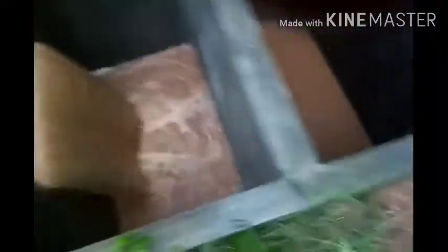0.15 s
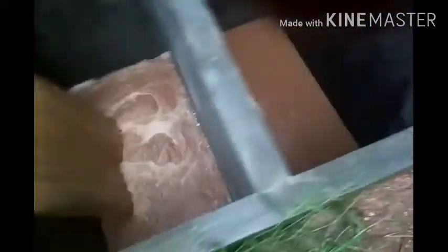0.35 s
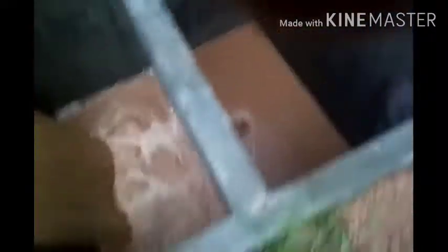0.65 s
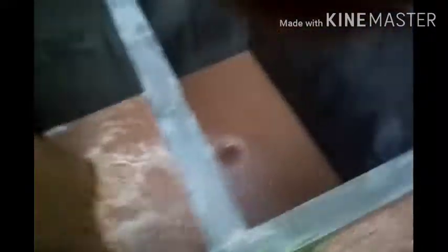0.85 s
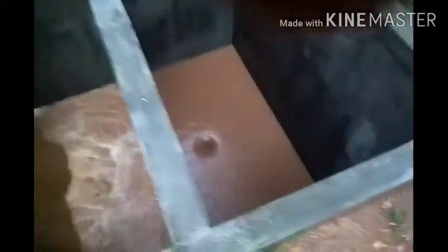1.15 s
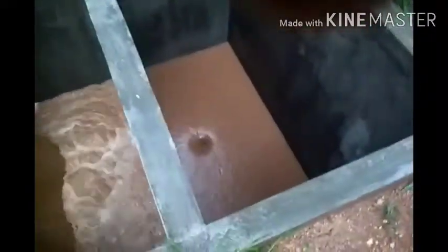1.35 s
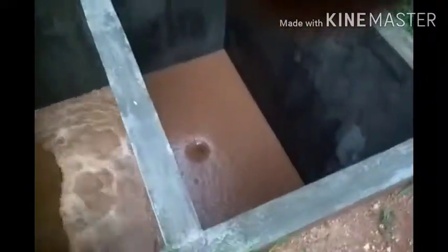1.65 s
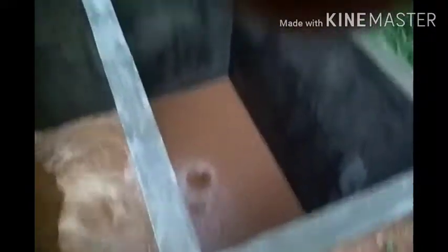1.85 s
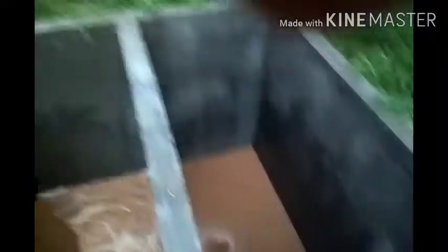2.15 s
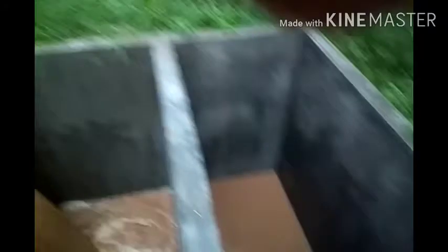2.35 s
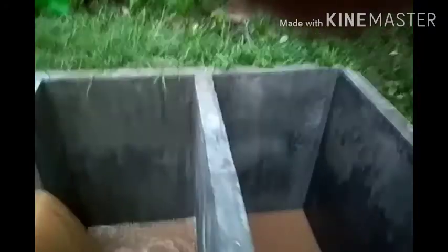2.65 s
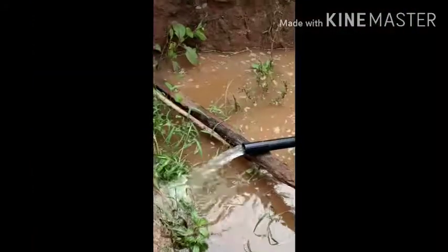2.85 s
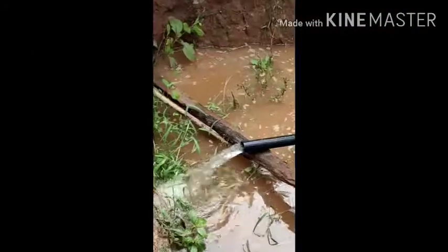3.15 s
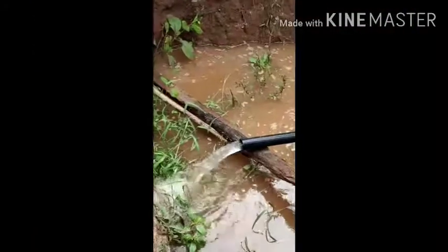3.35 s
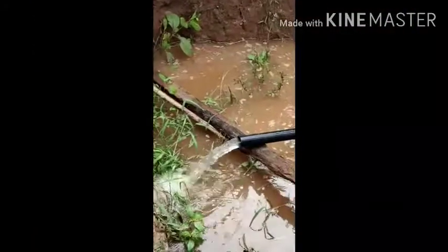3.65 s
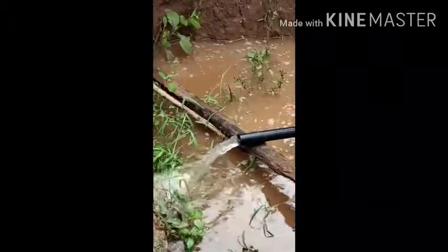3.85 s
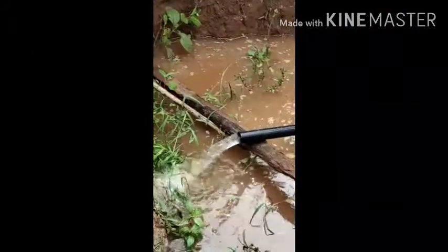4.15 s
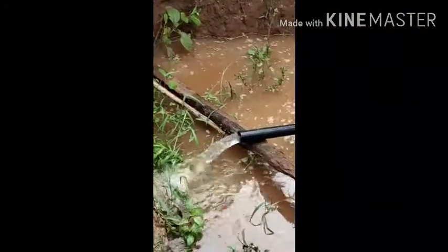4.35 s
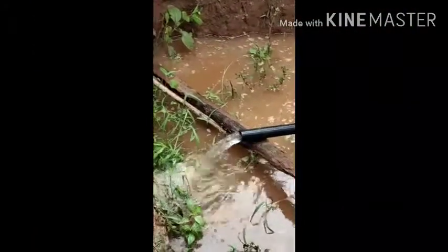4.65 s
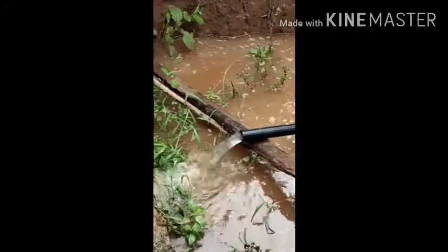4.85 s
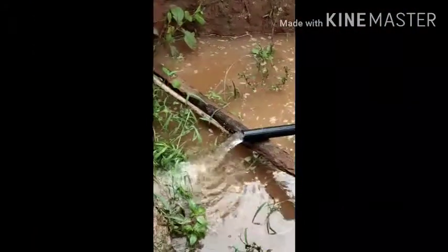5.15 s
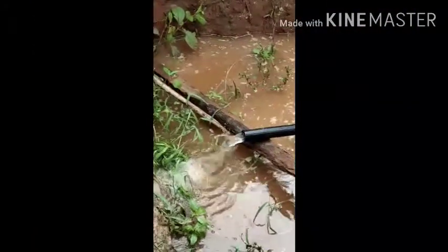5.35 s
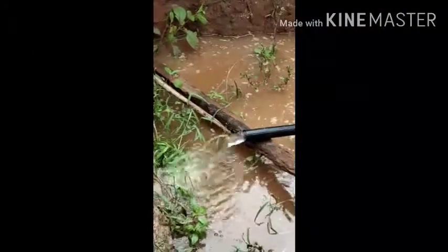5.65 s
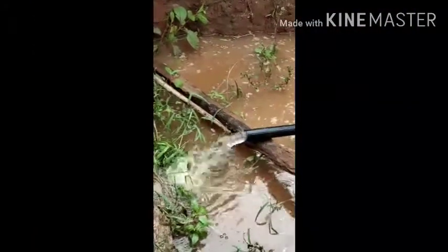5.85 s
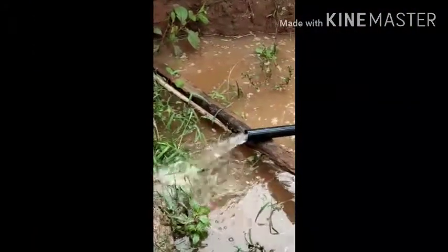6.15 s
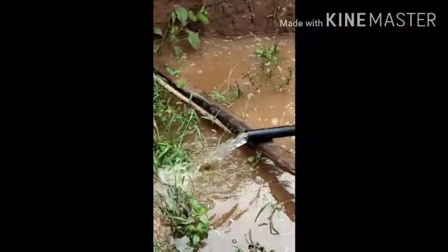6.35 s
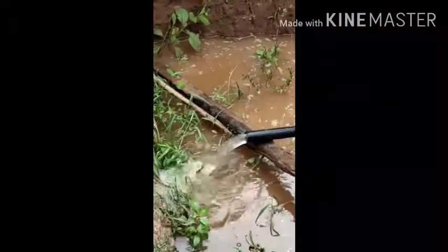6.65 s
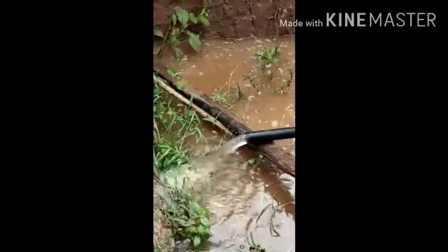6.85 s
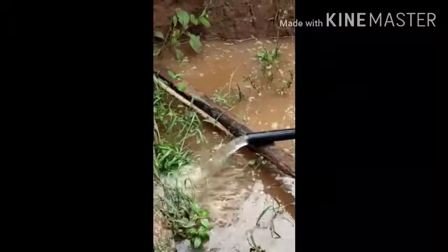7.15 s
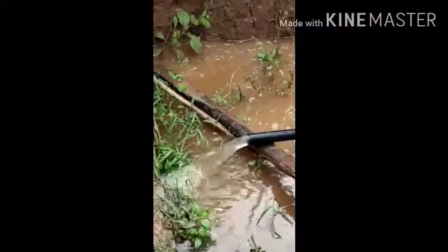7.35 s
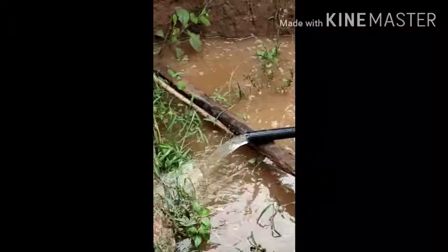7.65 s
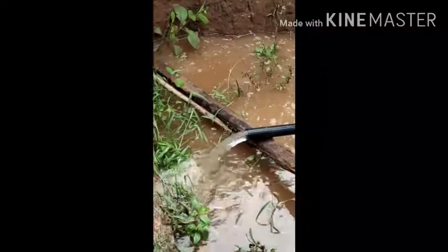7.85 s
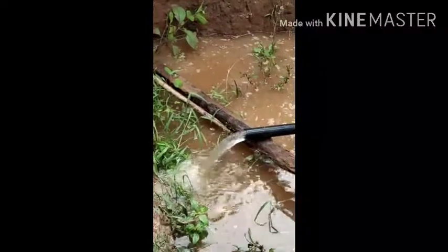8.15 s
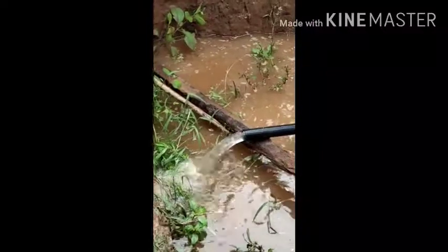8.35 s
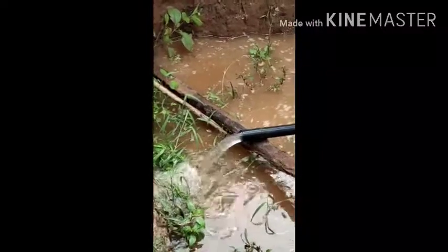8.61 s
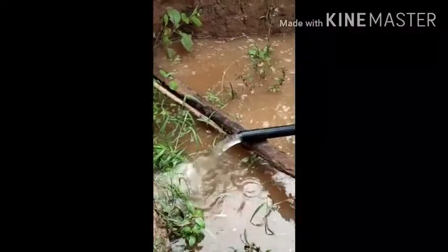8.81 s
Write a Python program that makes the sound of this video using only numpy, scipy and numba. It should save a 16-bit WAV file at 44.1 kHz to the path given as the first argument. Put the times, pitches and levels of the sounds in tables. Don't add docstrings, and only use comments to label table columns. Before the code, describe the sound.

Muddy water gushes into a concrete pit, a thick, full roar with uneven heaves, fizzing spray and dull low knocks, strongest just after one second. Near three seconds it quickly fades into a quieter outdoor pour: a pipe jet splashing in a ditch, with wet slaps, hollow glugs and crisp drops. The flow surges most around the middle, then calms. Close stereo pickup, slightly lossy.

```python
import sys
import numpy as np
from scipy import signal
from scipy.fft import rfft, irfft, next_fast_len
from scipy.io import wavfile
from scipy.ndimage import uniform_filter1d, minimum_filter1d, map_coordinates
from numba import njit

SR = 44100
rng = np.random.default_rng(int(sys.argv[2]) if len(sys.argv) > 2 else 0)


def to_linear_factor(level_db):
    exponent = np.asarray(level_db, float) / 20
    return 10 ** exponent


def file_out(sig):
    cols = np.atleast_2d(sig).T
    lim = np.clip(cols, -1, 1)
    pcm = np.round(lim * 32767).astype(np.int16)
    wavfile.write(sys.argv[1], SR, pcm)


N = 396009
PIT_N, DITCH_N = 3 * SR, N - int(2.8 * SR)
FADE_START_S, FADE_END_S = 2.862, 2.946


def unit(x):
    return x / np.sqrt(np.mean(np.mean(np.atleast_2d(x), 0) ** 2) + 1e-20)


def curve(rows):
    s, db = np.transpose(rows)
    return np.interp(np.arange(N) / SR, s, db)


def wobble(rate):
    knots = rng.standard_normal(int(N * rate / SR) + 4)
    return map_coordinates(knots, [np.arange(N) * rate / SR], order=1)


def swells(rows, rise, fall):
    t = np.arange(N) / SR
    total = np.zeros(N)
    for s, long, db in rows:
        hold_end = s + max(long - fall, rise + .001)
        total += db * np.interp(t, [s - rise, s + rise, hold_end, s + long + fall], [0, 1, 1, 0])
    return total


def jolts(s, db, fade):
    kicks = np.bincount(np.clip(s * SR, 0, N - 1).astype(int), to_linear_factor(db), N)
    return signal.lfilter([1], [1, -np.exp(-1 / (fade * SR))], kicks)


@njit
def ring(n, sr, start, hz, cycles, size, aside, rise):
    out = np.zeros((2, n))
    for i in range(len(start)):
        life = cycles[i] / hz[i] * sr
        step = 2 * np.pi * hz[i] / sr
        for k in range(min(int(4 * life), n - start[i])):
            u = k / life
            envelope = size[i] * np.exp(-1.5 * u) * min(1.0, 8 * u)
            v = envelope * np.sin(step * k * (1 + rise * u / 2))
            out[0, start[i] + k] += v
            out[1, start[i] + k] += v * aside[i]
    return out


def bubbles(n, s, hz, cycles, size, aside, rise):
    start = np.clip(s * SR, 0, n - 1).astype(np.int64)
    return ring(n, SR, start, np.clip(hz, 20, SR / 3), cycles, size, aside, rise)


def cluster(events, count, spacing, scatter, cycles, fall_db, gain_db, rise):
    s, db, hz = np.transpose(events)[:3, :, None]
    g = rng.standard_normal((len(events), count, 3))
    nth = np.arange(count)
    when = s + spacing * nth * np.exp(.3 * g[..., 0])
    pitch = hz * np.exp(scatter * g[..., 1] * (nth > 0))
    size = to_linear_factor(db + gain_db - fall_db * nth)
    aside = .5 * g[..., 2]
    lives = np.full(size.size, cycles)
    return bubbles(N, when.ravel(), pitch.ravel(), lives, size.ravel(), aside.ravel(), rise)


def froth(n, low_hz, high_hz, count, cycles, spread_db, grain_db, patchy_db):
    u, g = rng.random((count, 3)), rng.standard_normal((count, 2))
    hz = low_hz * (high_hz / low_hz) ** u[:, 1]
    size = hz * to_linear_factor(-spread_db * np.log(u[:, 2] + 0.0042))
    swarm = bubbles(n, n / SR * u[:, 0], hz, cycles * np.exp(0.24 * g[:, 0]), size, g[:, 1], 0.056)
    z = signal.stft(rng.standard_normal((2, n)), nperseg=512)[2]
    field = uniform_filter1d(rng.standard_normal(z.shape[1:]), size=4, axis=0)
    field = uniform_filter1d(field, size=4, axis=1)
    patches = to_linear_factor(patchy_db * field / field.std())
    rush = signal.istft(z * patches, nperseg=512)[1][:, :n]
    return rush / rush.std() + to_linear_factor(grain_db) * swarm / swarm[0].std()


def ports(pair, table, lag_s, lag_hz, low_hz=0, high_hz=SR, tilt_only=False):
    n = pair.shape[1]
    m = next_fast_len(n + 8192)
    hz = np.fft.rfftfreq(m, 1 / SR) + 1
    f, *cols = np.transpose(table)
    left_db, right_db, alike = [np.interp(np.log(hz), np.log(f), c) for c in cols]
    turn = np.arccos(np.clip(alike, 0, 1)) / 2
    shared, apart = rfft(pair, m) * [np.cos(turn), np.sin(turn)]
    mean_db = (left_db + right_db) / 2 * tilt_only
    band = 1 / np.sqrt((1 + (low_hz / hz) ** 12) * (1 + (hz / high_hz) ** 12))
    late = np.exp(-1j * np.pi * hz * lag_s / (1 + (lag_hz / hz) ** 2))
    left = (shared + apart) * to_linear_factor(left_db - mean_db) * late
    right = (shared - apart) * to_linear_factor(right_db - mean_db) / late
    return irfft(np.array([left, right]) * band, m)[:, :n]


# (frequency [Hz], left [dB per Hz], right [dB per Hz], likeness of ports [0-1])
PIT_PORTS = [(35, 4, 7, 1), (86, -10.5, -13.5, 0.74), (187, -5.5, -11.5, 0.99), (250, 0.5, -2, 0.96),
             (350, 3.5, 4, 0.96), (500, 1, -0.5, 0.94), (695, -5.0, -7.5, 0.98), (1400, -5.5, -12, 0.89),
             (1960, -9, -8, 0.46), (2800, -25.5, -16.5, 0), (4700, -18.5, -20.5, 0), (5840, -22, -21, 0.07),
             (8000, -23.5, -21, 0), (10350, -18, -12.5, 0), (12500, -23, -12.5, 0.25),
             (16400, -12, -24.5, 0.3)]


def at_pit(pair, low_hz, high_hz, tilt_only=False):
    return unit(ports(pair, PIT_PORTS, 0.000288, 730, low_hz, high_hz, tilt_only))


# (frequency [Hz], left [dB per Hz], right [dB per Hz], likeness of ports [0-1])
DITCH_PORTS = [(30.3, -11, -9, 0.91), (175, -9, -9, 0.97), (350, -2, -3, 0.98), (586, -7, -11.5, 0.44),
               (900, -4.5, -3.5, 0.54), (1240, -6, -7.5, 0.53), (1880, 0, -5.5, 0.96),
               (2390, -5.5, -10.5, 0.52), (2960, -13.5, -12.5, 0.52), (4460, -12, -15.5, 0.14),
               (5270, -22, -19, 0.61), (6150, -13, -20.5, 0.1), (8450, -16, -8, 0.037),
               (9800, -21.5, -18, 0.56), (11000, -17.5, -20.5, 0.26), (12500, -15.5, -26, 0.21),
               (15100, -21, -38, .2), (15600, -28, -42, 0.17)]


def at_ditch(pair, low_hz=0, high_hz=SR, tilt_only=False):
    return ports(pair, DITCH_PORTS, 0.000212, 2420, low_hz, high_hz, tilt_only)


# (time [s], strength [dB])
DRAUGHT = [(0, -57), (.34, -56), (.42, -48), (.6, -57), (.71, -50), (.77, -57), (.9, -55), (1.15, -51),
           (1.3, -48), (1.5, -51), (2, -54), (2.37, -65), (2.6, -55), (2.9, -61)]


def pit_draught():
    draught_db = curve(DRAUGHT)[:PIT_N]
    rumble = froth(PIT_N, 100, 190, count=40, cycles=3.5, spread_db=2, grain_db=-16, patchy_db=.3)
    upper = to_linear_factor(draught_db + 3) * at_pit(rumble, 75, 205, tilt_only=True)
    lower = to_linear_factor(-53.5 + 0.57 * (draught_db + 51)) * at_pit(rumble, 9.2, 73, tilt_only=True)
    return upper + lower


# (time [s], level [dB])
THROB = [(0, -61), (.45, -57), (1.07, -60), (1.12, -39), (1.28, -35), (1.39, -44), (1.45, -53), (1.66, -51),
         (1.75, -58), (2.05, -64)]


def pit_throb():
    throb_db = curve(THROB)[:PIT_N]
    foam = froth(PIT_N, 83, 85, count=60, cycles=4.2, spread_db=-2, grain_db=-29, patchy_db=8.5)
    since_peak_s = (np.arange(PIT_N) - throb_db.argmax()) / SR
    sinking = 0.066 * np.clip(since_peak_s, 0, .15) / 0.23
    hz = 92 * (1 + 0.025 * wobble(5.97)[:PIT_N] - sinking)
    tone = np.sin(2 * np.pi * np.cumsum(hz) / SR)
    return to_linear_factor(throb_db - 3.5) * at_pit(foam, 82, 99) + to_linear_factor(throb_db + 1.5) * tone


# (time [s], strength [dB])
CHURN = [(0, -38), (1, -37.5), (1.4, -39), (1.62, -39.5), (1.8, -38), (2.2, -38.5), (2.4, -40), (2.6, -39),
         (2.85, -39.5)]
# (start [s], length [s], swell [dB])
HEAVES = [(.05, 0.11, 1), (.27, 0.041, 2), (.8, 0.084, 3), (.94, 0.046, 3), (1.11, 0.036, 1),
          (1.43, 0.051, 0), (1.57, 0.078, 6), (1.855, 0.043, 5.5), (2.08, 0.087, 1.5), (2.23, 0.023, 3),
          (2.56, 0.058, 4)]


def pit_roar():
    n = PIT_N
    churn_db = curve(CHURN)
    swing_db = churn_db - churn_db[:n].mean() + swells(HEAVES, rise=0.031, fall=0.037)
    churn = wobble(15)
    plunge_db = -34.68 + .9 * swing_db + .5 * churn
    bubbling_db = -36 + .7 * swing_db + .9 * churn
    spray_db = -31.98 + 0.26 * churn + 0.15 * wobble(39.53)
    plunge = froth(n, 202.2, 803.5, count=1500, cycles=10.1, spread_db=-.5, grain_db=-5, patchy_db=0)
    bubbling = froth(n, 607, 3370, count=4000, cycles=10.1, spread_db=-1, grain_db=-5.5, patchy_db=-.6)
    spray = froth(n, 2400, 15600, count=9000, cycles=1.7, spread_db=1.5, grain_db=-10, patchy_db=1.53)
    roar = to_linear_factor(plunge_db[:n]) * at_pit(plunge, 190, 700)
    roar += to_linear_factor(bubbling_db[:n]) * at_pit(bubbling, 700, 3000)
    roar += to_linear_factor(spray_db[:n]) * at_pit(spray, 3000, 18000)
    return roar


def ditch_rumble():
    low = froth(DITCH_N, 63, 187, count=80, cycles=1.9, spread_db=3.5, grain_db=-21.5, patchy_db=1.4)
    deep = froth(DITCH_N, 30, 60, count=10, cycles=3, spread_db=4, grain_db=-32, patchy_db=8)
    return to_linear_factor(-65) * unit(at_ditch(low, 62, 210)) + to_linear_factor(-84) * unit(at_ditch(deep, 15, 50))


# (start [s], length [s], swell [dB])
DRONES = [(3.1, .15, 5), (5.35, .14, 11), (5.52, .27, 8), (6.94, .14, 8)]


def pipe_drone():
    drone_db = (-68.5 + swells(DRONES, rise=.02, fall=0.025) + 2 * wobble(7.8))[-DITCH_N:]
    low = froth(DITCH_N, 140, 200, count=200, cycles=6, spread_db=1, grain_db=-10, patchy_db=.8)
    octave = froth(DITCH_N, 290, 370, count=200, cycles=8, spread_db=1, grain_db=-10, patchy_db=.8)
    drone = to_linear_factor(drone_db + 2) * unit(at_ditch(low, 150, 190))
    return drone + to_linear_factor(drone_db - 1) * unit(at_ditch(octave, 300, 360))


# (time [s], strength [dB])
FLOW = [(2.97, -51), (3.6, -51.5), (4.7, -51.5), (5.15, -53), (5.6, -52.5), (6.4, -54), (7.0, -52.5),
        (7.5, -54), (8.5, -53), (8.98, -53.5)]
# (start [s], length [s], swell [dB])
SURGES = [(3.01, 0.078, 2), (3.3, 0.057, 0.5), (3.75, 0.081, 11), (4.17, 0.16, -2), (4.39, 0.054, 3),
          (4.97, 0.08, 3), (5.14, 0.21, -5.5), (5.33, 0.051, 6), (5.43, 0.07, 8), (5.62, 0.051, 14),
          (5.68, 0.096, 11.5), (5.74, 0.028, 19), (5.88, 0.15, 8), (6.09, 0.11, 19.5), (6.27, 0.08, 5),
          (6.3, 0.14, 16), (6.52, 0.1, 16.5), (6.72, 0.057, 22), (6.8, 0.18, 10), (6.92, 0.048, -3),
          (7.1, 0.053, -3), (7.19, 0.1, 5), (7.47, 0.026, 14), (7.61, 0.034, 5), (7.81, 0.12, 4),
          (8.0, 0.071, -4), (8.21, 0.022, 8), (8.7, 0.035, -1), (8.8, 0.018, 15), (8.93, 0.071, 15)]


def ditch_pour():
    n = DITCH_N
    flow_db = curve(FLOW)
    drift_db = flow_db - flow_db[-n:].mean()
    surge_db = swells(SURGES, rise=0.009, fall=0.013)
    calm_db = np.interp(np.arange(N) / SR, [6.95, 7.2], [0, -3])
    surge = wobble(25)
    plunge_db = -57 + .79 * drift_db + 0.034 * surge_db + .6 * surge + 2 * wobble(9) + calm_db
    bubbling_db = -49.5 + drift_db + 0.18 * surge_db + surge
    spray_db = -52 + drift_db + 0.34 * surge_db
    mist_db = 1.6 * (spray_db + 48) - 55.5

    lumps = rng.random((250, 2))
    small = jolts(lumps[:, 0] * N / SR, -14 * lumps[:, 1], fade=0.013)
    s, db = np.transpose(SLAPS)[:2]
    large = jolts(s, db + 33, fade=.008)
    bubbling_gain = to_linear_factor(bubbling_db) * (1 + 0.31 * small + 0.5 * large)
    spray_gain = to_linear_factor(spray_db - 1 + 1.3 * surge) * (1 + 1.08 * small + 0.31 * large)
    mist_gain = to_linear_factor(mist_db) * (1 + .3 * small + .3 * large)

    plunge = froth(n, 220, 720, count=600, cycles=8, spread_db=2.2, grain_db=-9, patchy_db=1)
    bubbling = froth(n, 609, 3378, count=5500, cycles=14, spread_db=1, grain_db=-2, patchy_db=0)
    spray = froth(n, 2660, 13900, count=9000, cycles=6.3, spread_db=2, grain_db=-7, patchy_db=2.5)
    mist = froth(n, 10900, 14100, count=3000, cycles=4.8, spread_db=2, grain_db=-3, patchy_db=-4)
    pour = to_linear_factor(plunge_db[-n:]) * unit(at_ditch(plunge, 200, 650))
    pour += bubbling_gain[-n:] * unit(at_ditch(bubbling, 650, 3000))
    pour += spray_gain[-n:] * unit(at_ditch(spray, 3000, 10500))
    pour += mist_gain[-n:] * unit(at_ditch(mist, 10500, 18000))
    return pour


# (time [s], peak [dB], frequency [Hz])
THUMPS = [(0.405, -35, 140), (0.475, -34, 148), (0.71, -37, 148), (1.005, -42, 140), (1.255, -25.5, 140),
          (1.375, -33, 48), (1.522, -35, 137), (1.74, -35.5, 100), (1.821, -32, 124), (2.582, -41, 150),
          (3.7, -49, 80), (5.815, -50, 70)]


def thumps():
    return cluster(THUMPS, count=1, spacing=0, scatter=0, cycles=3.2, fall_db=0, gain_db=-1, rise=.092)[0]


# (time [s], peak [dB], frequency [Hz])
GLUGS = [(3.132, -44, 252.9), (3.704, -36.5, 290), (3.818, -46, 175), (3.886, -48, 406), (4.125, -51, 299),
         (4.16, -44, 298), (4.214, -43, 400), (4.307, -47, 330), (4.424, -49, 336), (4.621, -44, 334),
         (4.761, -45, 337), (4.86, -48, 338), (5.113, -55, 157.5), (5.171, -47, 230), (5.22, -50, 320),
         (5.375, -46, 166), (5.449, -43, 171), (5.817, -39, 160), (6.01, -41, 170), (6.09, -45, 320),
         (6.658, -45, 330), (6.857, -48, 277), (6.963, -44, 184), (7.266, -48, 350), (7.434, -54, 280),
         (7.791, -49, 336), (7.842, -45, 340), (8.062, -40.5, 386), (8.263, -45, 288), (8.289, -41, 300),
         (8.426, -45, 336), (8.531, -49, 326)]
# (time [s], peak [dB])
GULPS = [(5.82, -39), (6.038, -47), (6.445, -44), (6.959, -47)]
# (time [s], peak [dB], start frequency [Hz])
CHIRPS = [(6.006, -36, 160), (6.214, -37, 150), (6.372, -42, 250), (6.428, -45, 200)]
# (time [s], peak [dB], frequency [Hz])
GLOOP = [(5.654, -38, 593)]


def glugs():
    pockets = cluster(GLUGS, count=2, spacing=.012, scatter=.3, cycles=4, fall_db=9, gain_db=3, rise=.2)
    alone = dict(count=1, spacing=0, scatter=0, fall_db=0)
    gulps = [(s, db, 311) for s, db in GULPS]
    pockets += cluster(gulps, cycles=6, gain_db=3, rise=.25, **alone)
    pockets += cluster(CHIRPS, cycles=5, gain_db=2.5, rise=.95, **alone)
    pockets += cluster(GLOOP, cycles=16, gain_db=0, rise=.45, **alone)
    return at_ditch(pockets, low_hz=100, tilt_only=True)


# (time [s], peak [dB], frequency [Hz], left minus right [dB])
SPITS = [(3.3017, -28, 8000, -1.5), (3.3317, -34, 4350, 2), (3.4743, -23.5, 8450, -12),
         (3.9721, -28, 8010, -2.5), (4.0284, -37, 5530, 5), (4.185, -32, 5900, 0), (4.245, -26.5, 9300, -4),
         (4.3941, -44, 4400, 0.5), (4.431, -31, 8450, -3.0), (4.628, -33, 8020, -1.0),
         (4.8077, -40, 8280, -2.5), (5.058, -27, 8500, -11), (5.2296, -32, 7300, -0.5),
         (5.342, -32, 7160, 6), (5.3634, -31, 8500, -7), (5.6343, -24, 8500, -2.5), (5.751, -30, 8700, -4),
         (5.946, -30, 9100, 1.0), (6.0942, -31, 8400, -2.0), (6.2996, -29, 8390, -3.5),
         (6.542, -36, 8370, -0.5), (6.7328, -32, 7900, -0.5), (6.7906, -27.5, 8700, -1.0),
         (6.8642, -29.5, 8400, -9), (6.935, -28, 7950, -3.5), (7.629, -34, 7520, 7), (7.912, -32, 8700, -4),
         (8.2273, -28, 8350, -2.5), (8.8107, -29, 9000, -2), (8.954, -32, 8470, 2)]


def spits():
    drops = cluster(SPITS, count=7, spacing=0.00078, scatter=0.184, cycles=9.9,
                    fall_db=4.5, gain_db=-.5, rise=.03)
    pan_db = np.interp(np.arange(N) / SR, *np.transpose(SPITS)[[0, 3]])
    return drops[0] * to_linear_factor([pan_db / 2, -pan_db / 2])


# (time [s], peak [dB], bubble frequency [Hz])
SLAPS = [(3.021, -23.5, 1880), (3.134, -30, 1860), (3.185, -26, 1840), (3.303, -40, 1730),
         (3.352, -24, 1660), (3.548, -36, 1850), (4.431, -31.5, 1780), (4.534, -33, 1740),
         (4.699, -30, 1420), (4.823, -30.5, 1820), (4.892, -26, 1850), (5.074, -33, 1870),
         (5.297, -28, 2090), (5.431, -30, 1590), (5.54, -30, 1720), (5.631, -27.5, 1460),
         (5.752, -26.5, 1670), (6.376, -23.5, 1960), (6.929, -30, 1400), (7.337, -30, 1980),
         (7.734, -33, 920), (7.817, -31, 1550), (8.005, -34, 1770), (8.033, -26.5, 1520),
         (8.267, -30, 1880), (8.352, -37, 1820), (8.502, -21, 1240), (8.709, -27.5, 1770),
         (8.817, -28, 1820), (8.898, -31, 920)]
# (time [s], peak [dB], bubble frequency [Hz])
EXTRA_SLAPS = [(3.074, -29, 1210), (3.3, -34, 900), (3.365, -31, 900), (3.624, -32.5, 840), (4.148, -28.5, 855),
               (4.182, -27, 1600), (4.428, -32.5, 800), (5.04, -34, 790), (5.46, -28, 1000), (6.164, -27, 2070),
               (6.256, -33, 774), (6.322, -31, 930), (6.42, -36, 775), (6.88, -32, 930), (7.254, -29, 1610),
               (8.728, -27.5, 1930)]
# (time [s], peak [dB], bubble frequency [Hz])
MORE_SLAPS = [(3.036, -30, 1880), (3.052, -31, 1140), (3.115, -33.5, 810), (3.334, -29, 1750), (3.371, -28, 1830),
              (3.433, -31, 1120), (3.561, -29, 1760), (3.679, -30, 1760), (3.711, -32.5, 953), (3.823, -35, 1830),
              (4.23, -38, 1850), (5.019, -30, 1830), (5.198, -30.5, 1520), (5.377, -28, 1900), (5.525, -36, 1800),
              (5.561, -31, 1560), (5.884, -37, 1540), (6.304, -34, 1860), (6.472, -35, 786), (6.543, -30, 1540),
              (7.197, -30, 1310), (7.676, -43, 1890), (7.749, -35, 840), (7.767, -31, 1840), (7.827, -27, 1720),
              (7.85, -36, 1800), (8.055, -29.5, 1890), (8.174, -32, 1550), (8.362, -27, 1850), (8.638, -38, 1870),
              (8.93, -28, 1880)]


def slaps():
    u = rng.standard_normal((30, 2))
    when = rng.uniform(FADE_END_S, N / SR, len(u))
    lesser = np.c_[when, -41.5 + 3 * u[:, 0], 1534 * np.exp(.3 * u[:, 1])]
    lumps = cluster(np.r_[SLAPS, EXTRA_SLAPS, MORE_SLAPS, lesser], count=3, spacing=0.0049, scatter=.13,
                    cycles=5.3, fall_db=4.5, gain_db=-1.5, rise=.033)
    return at_ditch(lumps, low_hz=100, tilt_only=True)


def scene():
    cross = np.interp(np.arange(N) / SR, [FADE_START_S, FADE_END_S], [0, 1])
    pit = np.pad(pit_draught() + pit_throb() + pit_roar(), ((0, 0), (0, N - PIT_N)))
    ditch = np.pad(ditch_rumble() + pipe_drone() + ditch_pour(), ((0, 0), (N - DITCH_N, 0)))
    places = to_linear_factor(-19 * cross) * (cross < 1) * pit + np.sqrt(cross) * ditch
    return places + thumps() + glugs() + spits() + slaps()


# (frequency [Hz], each port over the pit [dB], sum of ports over the pit [dB], ditch [dB])
GAPS = [(1500, -10, -10, -12), (1800, -9, -4, -12), (2300, -7, -8, -10), (2750, -6, -6, -4.8),
        (3250, -6, -6, -3.2), (3700, -5.5, -5.5, -4.5), (4300, -4, -2.3, -7), (5100, -5.5, -5.5, -6),
        (6100, -3.8, -2.2, -6.5), (6900, -4.8, -4.4, -7), (8300, -4, -3.7, -7), (9500, -5.5, -6, -6),
        (10600, -6.5, -6.5, -5), (11000, -6.5, -6.5, -2.8), (11500, -6.5, -6.5, -6.5),
        (14000, -5.5, -4.8, -6.5)]


def thin(pair, pit_db, ditch_db):
    hz, s, z = signal.stft(pair, SR, window="cosine", nperseg=2048, noverlap=1024)
    wide = 8
    power = (np.abs(z[:, :-1]) ** 2).reshape(len(z), -1, wide, len(s)).mean(axis=2)
    hz = hz[:-1].reshape(-1, wide).mean(axis=1)
    f = np.transpose(GAPS)[0]
    pit_dip = np.interp(hz, f, pit_db, left=-40)[:, None]
    ditch_dip = np.interp(hz, f, ditch_db, left=-40)[:, None]
    dip_db = np.where(s < FADE_END_S, pit_dip, ditch_dip)
    keep = power >= uniform_filter1d(power, size=5, axis=1) * to_linear_factor(2 * dip_db)
    keep = np.where((hz > 3000)[:, None], minimum_filter1d(keep * 1, size=2, axis=1), keep) > 0
    audible = uniform_filter1d(power, size=2, axis=1) > to_linear_factor(2 * -93.5)
    keep &= audible | (hz < 13300)[:, None]
    keep = np.repeat(minimum_filter1d(keep * 1., size=2, axis=2), wide, axis=1)
    z = z * np.pad(keep, ((0, 0), (0, 1), (0, 0)))
    return signal.istft(z, SR, window="cosine", nperseg=2048, noverlap=1024)[1][:, :N]


def top_cut(x):
    return signal.sosfilt(signal.butter(12, 15790, fs=SR, output="sos"), x)


def record(dry):
    _, port_db, sum_db, ditch_db = np.transpose(GAPS)
    left, right = thin(dry, port_db, ditch_db - 4)
    mid, side = thin(np.array([left + right, left - right]) / 2, sum_db, ditch_db)
    return top_cut(np.array([mid + side, mid - side]))


dry = scene()
out = record(dry)
file_out(out)
```